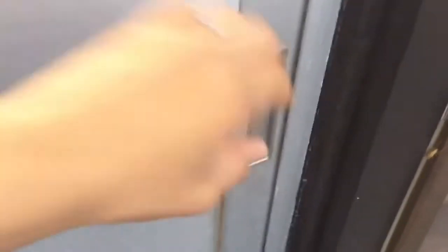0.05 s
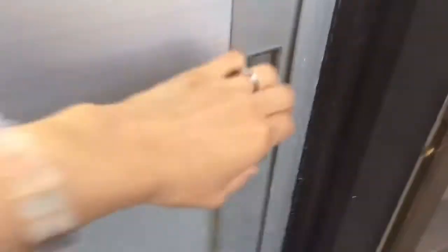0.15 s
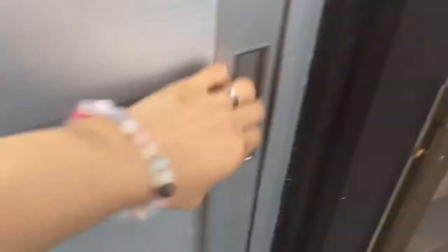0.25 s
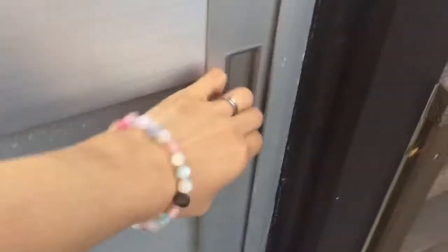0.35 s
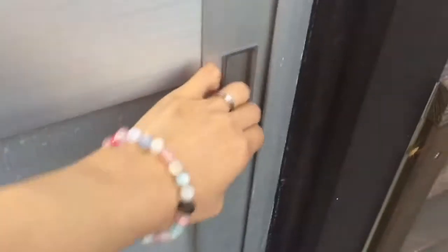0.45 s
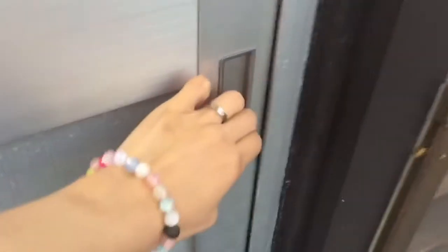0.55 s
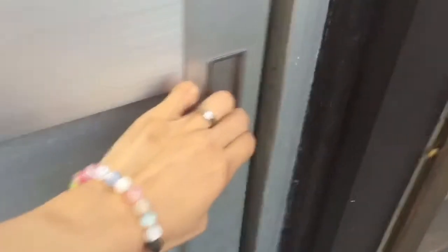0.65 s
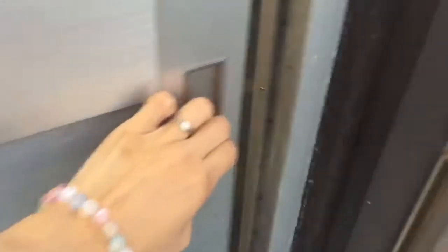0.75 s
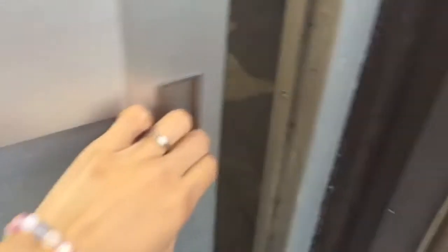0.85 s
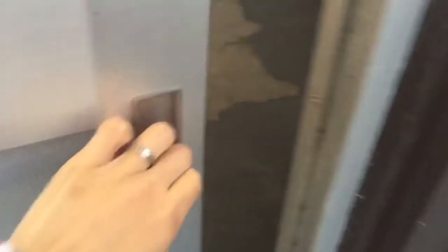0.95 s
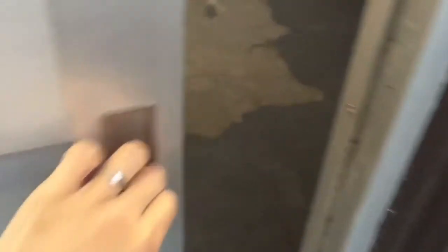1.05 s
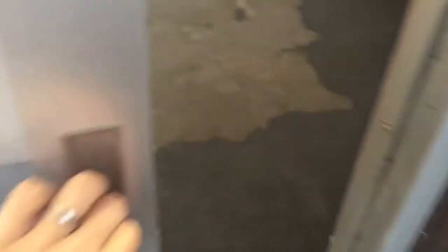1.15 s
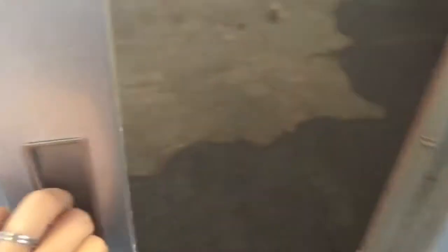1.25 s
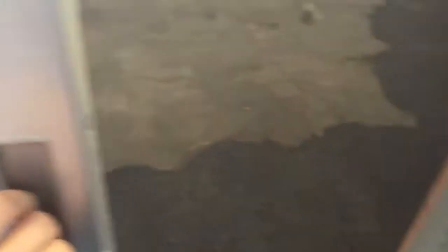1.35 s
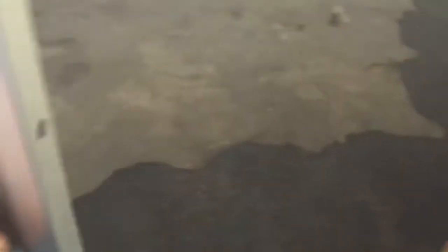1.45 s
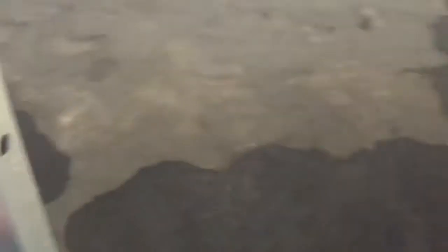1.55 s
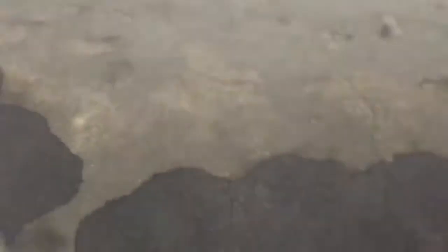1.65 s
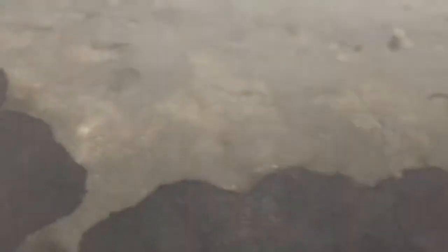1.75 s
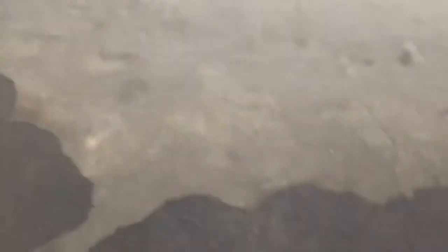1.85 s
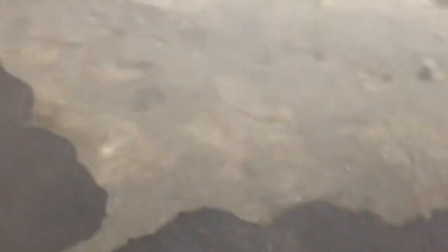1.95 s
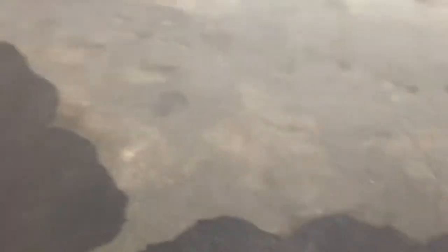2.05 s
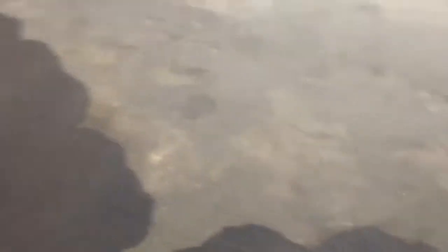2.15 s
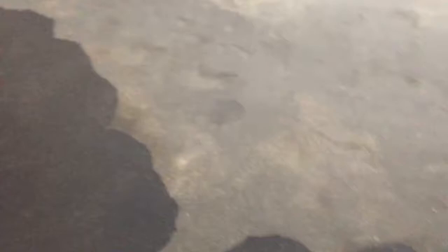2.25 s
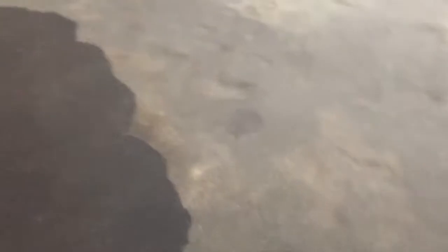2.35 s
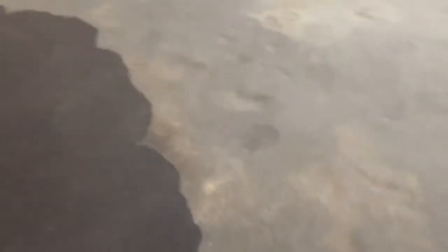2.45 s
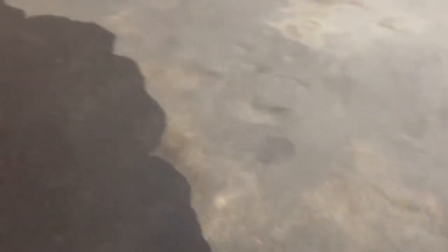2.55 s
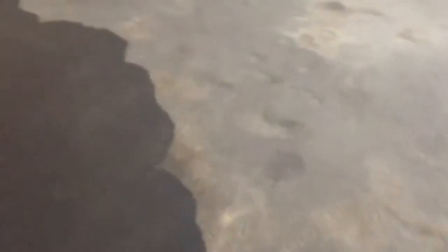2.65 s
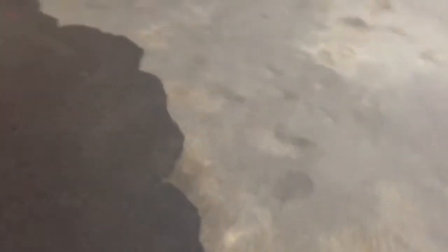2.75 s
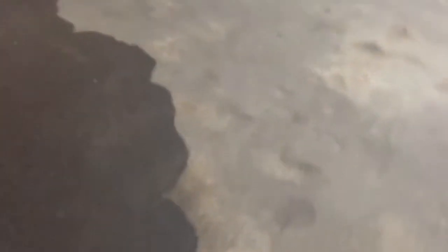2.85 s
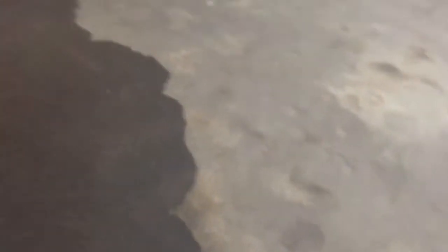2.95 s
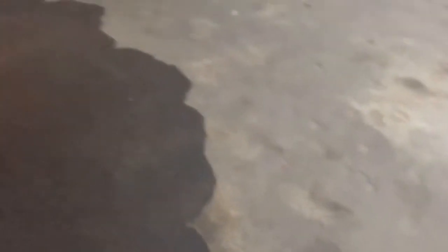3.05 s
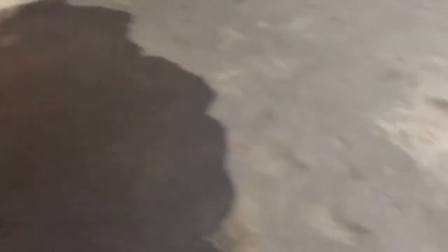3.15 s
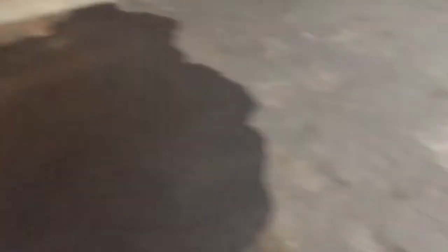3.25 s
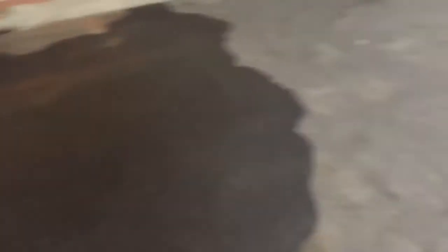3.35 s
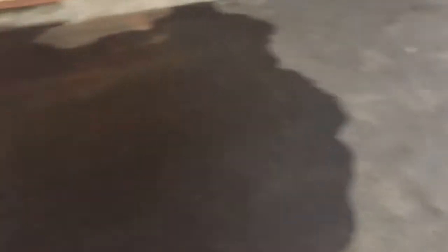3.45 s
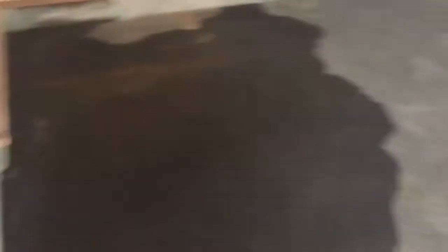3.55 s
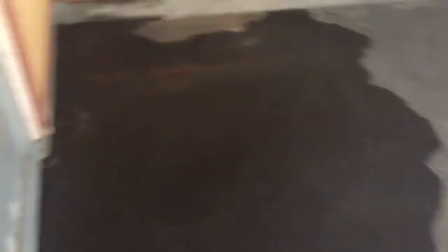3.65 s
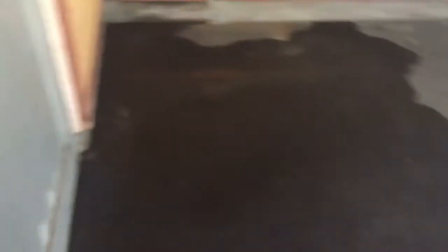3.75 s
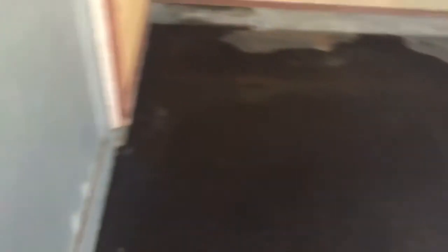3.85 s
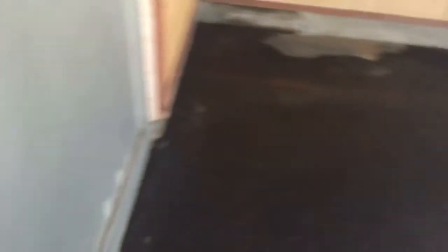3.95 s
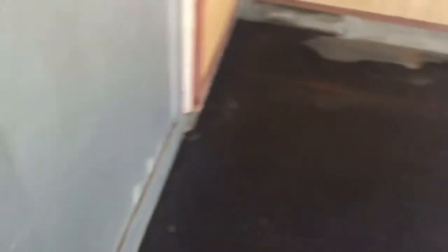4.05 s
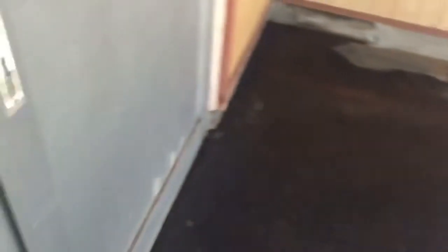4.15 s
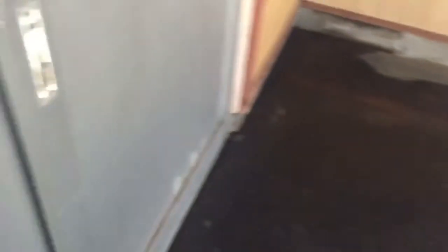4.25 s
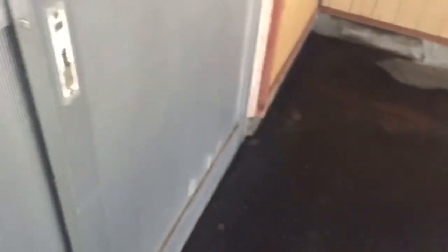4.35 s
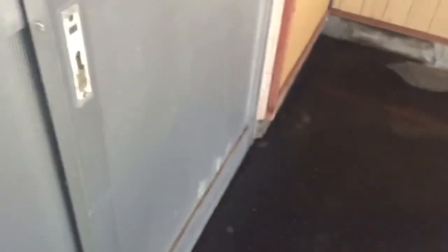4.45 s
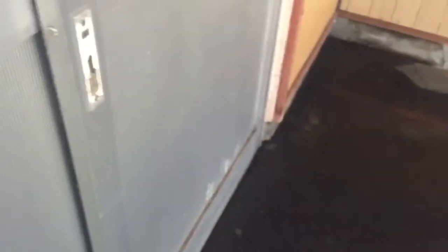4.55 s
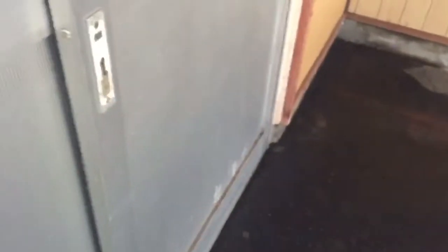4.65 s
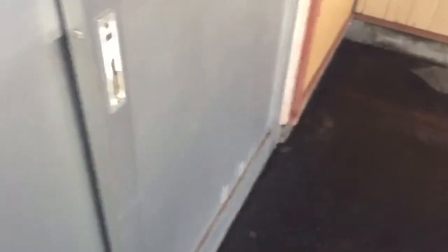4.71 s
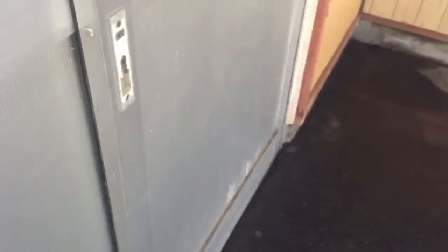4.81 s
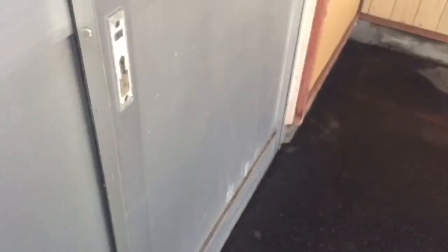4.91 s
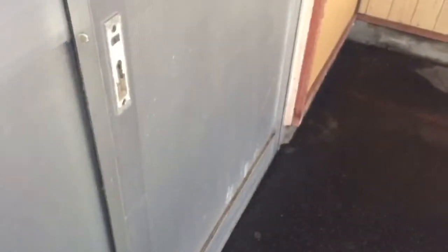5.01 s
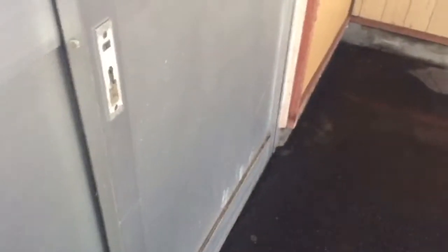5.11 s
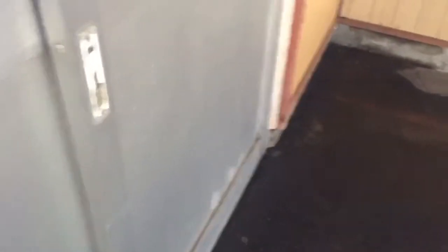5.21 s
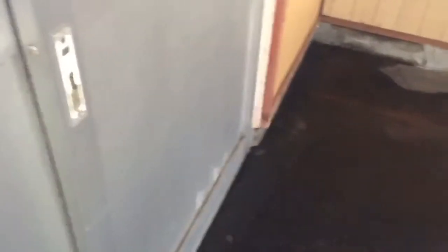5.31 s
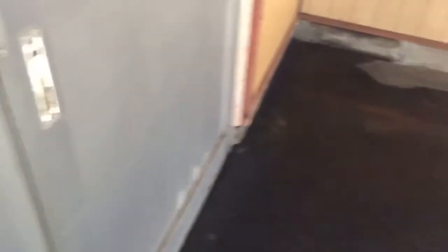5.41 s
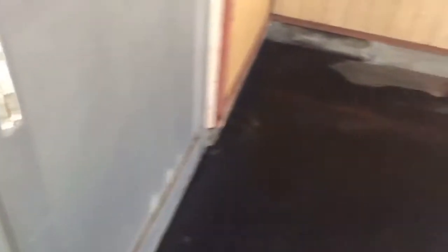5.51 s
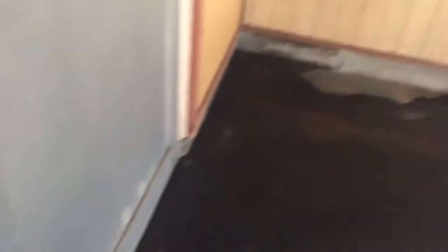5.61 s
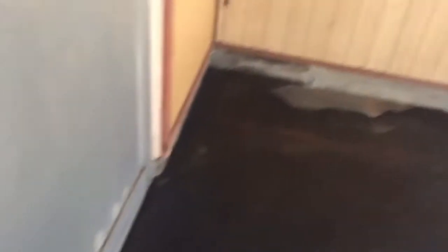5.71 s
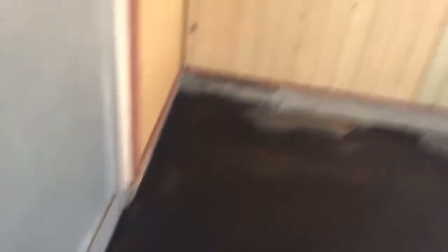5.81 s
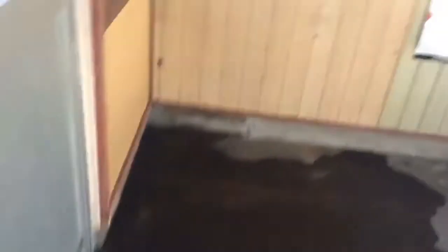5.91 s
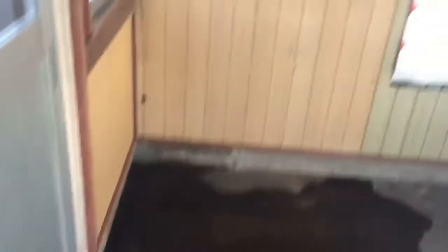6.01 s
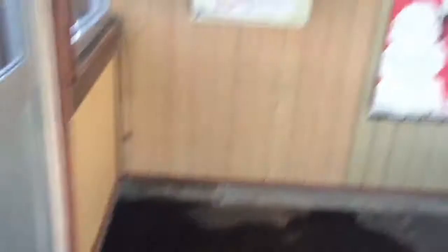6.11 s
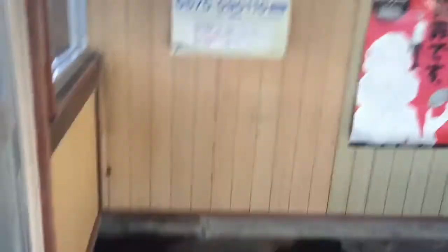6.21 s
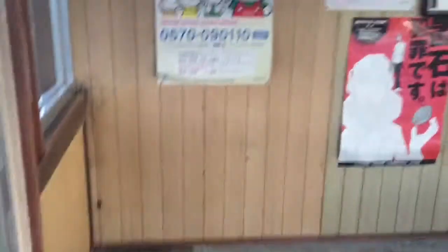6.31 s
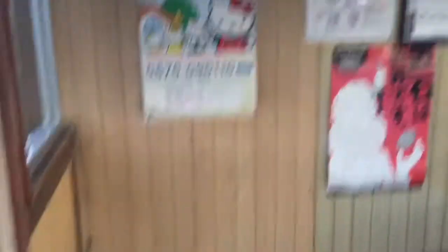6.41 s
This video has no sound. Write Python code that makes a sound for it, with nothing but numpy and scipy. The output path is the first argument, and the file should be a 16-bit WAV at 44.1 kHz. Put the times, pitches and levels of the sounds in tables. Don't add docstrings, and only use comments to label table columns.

```python
import sys
import numpy as np
from scipy import signal
from scipy.fft import rfft, irfft
from scipy.io import wavfile
from scipy.ndimage import uniform_filter1d

SR = 44100
rng = np.random.default_rng(int(sys.argv[2]) if len(sys.argv) > 2 else 0)


def materialize(psi):
    bounded = np.clip(np.atleast_2d(psi).T, -1, 1)
    quanta = np.round(bounded * 32767).astype(np.int16)
    wavfile.write(sys.argv[1], SR, quanta)


def makeup_ratio(level_db):
    decades = np.asarray(level_db, float) / 20
    return 10 ** decades


N = 285471
PANEL_HIDDEN_S, STEP_IN_S = 2.125, 3.5
FULL_SPEED_DB, FIRM_DRAG_DB = -33, -50


def rms_one(x):
    return x / np.sqrt(np.mean(x ** 2) + 1e-20)


def peak_one(x):
    return x / np.max(np.abs(x))


def in_time(rows):
    s, *columns = np.transpose(rows)
    return [np.interp(np.arange(N) / SR, s, c) for c in columns]


def played(rows):
    silent = [-110] * (len(rows[0]) - 1)
    before, after = [rows[0][0] - .05, *silent], [rows[-1][0] + 0.17, *silent]
    return in_time([before, *rows, after])


def drift(rate):
    r = np.exp(-2 * np.pi * rate / SR)
    slow = signal.lfilter([1], [1, -2 * r, r * r], rng.standard_normal(N + SR))
    return rms_one(slow[SR:])


def steady(x, span_s):
    return rms_one(x / np.sqrt(uniform_filter1d(x ** 2, int(span_s * SR)) + 0.12))


def band(x, low_hz, high_hz, order=2):
    return signal.sosfilt(signal.butter(order, [low_hz, min(high_hz, .45 * SR)], "band", fs=SR, output="sos"), x)


def resonate(x, hz, width_hz):
    r = np.exp(-np.pi * width_hz / SR)
    return signal.lfilter(np.array([1, 0, -1]) * (1 - r * r) / 2, [1, -2 * r * np.cos(2 * np.pi * hz / SR), r * r], x)


def ring(x, hz, t60):
    r, w = makeup_ratio(-60 / (t60 * SR)), 2 * np.pi * hz / SR
    return signal.lfilter([0, np.sin(w)], [1, -2 * r * np.cos(w), r * r], x + 1e-18)


def clicks(times, db):
    out = np.zeros(N)
    out[(np.asarray(times) * SR).astype(int)] = makeup_ratio(db)
    return out


def coloured(x, spectrum):
    hz, db = np.transpose(spectrum)
    grid = np.log(np.arange(N // 2 + 1) * SR / N + 1)
    return rms_one(irfft(rfft(x) * makeup_ratio(np.interp(grid, np.log(hz), db)), N))


def grains(per_s, spread_db):
    sizes = makeup_ratio(spread_db * np.minimum(rng.exponential(1, N), 5)) * rng.choice([-1, 1], N)
    contacts = rms_one(sizes * (rng.random(N) < per_s / SR))
    return contacts + .5 * rng.standard_normal(N)


def body(peaks, bumps, lumpy_db, lump_rate):
    out = np.zeros(N)
    for k, (hz, width, db) in enumerate(peaks):
        gain = makeup_ratio(db + lumpy_db * drift(lump_rate))
        out += (-1) ** k * gain * rms_one(resonate(bumps, hz, width))
    return rms_one(out)


def bursts(rows, gain_db, rise_s, t60, cycles):
    out, t = np.zeros(N + SR), np.arange(SR // 5) / SR
    for s, db, hz in rows:
        rough = rng.standard_normal(len(t)) * np.clip(t / rise_s, 0, 1) * makeup_ratio(-60 * t / t60)
        puff = band(resonate(rough, hz, hz / cycles), hz / 3.85, hz * 2.6, order=3)
        out[int(s * SR):][:len(t)] += makeup_ratio(db + gain_db) * peak_one(puff)
    return out[:N]


# (pitch [Hz], level [dB per Hz])
HISS_COLOUR = [(15, -16), (35, 12), (70, 10.5), (300, -5), (700, -10.5), (2000, -13), (3430, -14.5),
               (5000, -17), (10500, -23.5), (14000, -25), (16500, -26)]
# (time [s], level [dB])
HISS_LEVEL = [
    (0, -67),
    (3.1, -65),
    (5.8, -67.5),
    (6.5, -66.5),
]
# (time [s], level [dB])
INSECT_LEVEL = [
    (0, -75.5),
    (.6, -68),
    (2.5, -76),
    (3.1, -135),
    (4.5, -86),
    (5.3, -82),
    (6.5, -86),
]


def background():
    hiss = makeup_ratio(in_time(HISS_LEVEL)[0]) * coloured(rng.standard_normal(N), HISS_COLOUR)
    chirr = rng.standard_normal(N)
    for _ in range(2):
        chirr = resonate(chirr, 2370, 260)
    throb = makeup_ratio(1.0 * drift(20))
    sizzle = makeup_ratio(-8.0) * rms_one(band(rng.standard_normal(N), 13500, 16000))
    insects = throb * steady(rms_one(chirr), 0.096) + sizzle
    return hiss + makeup_ratio(in_time(INSECT_LEVEL)[0]) * insects


# (time [s], peak level [dB], ringing pitch [Hz], ringing level [dB], 60 dB fade [s])
BEAD_CLINKS = [(0.015, -37, 9700, -32, 0.023), (0.0234, -24, 2450, -23.5, 0.046),
               (0.214, -40.5, 3320, -3, 0.0066), (0.254, -39, 7000, -26, 0.032),
               (0.338, -19.5, 8580, -20.5, 0.034), (0.36, -34, 5500, -15, 0.035),
               (0.4324, -22, 8640, -22.5, 0.068), (0.4973, -39.5, 8660, -14, 0.049),
               (0.5518, -24, 8670, -19, 0.05), (1.1594, -29, 3200, -28, 0.035),
               (3.377, -46, 3250, -20, 0.035), (3.5673, -27, 8100, -25, 0.13),
               (4.2824, -20.5, 14350, -17, 0.021), (4.9062, -38, 2530, -24, 0.11),
               (4.9062, -40, 5310, -28, 0.06), (4.9062, -40, 6520, -30, 0.05),
               (4.9062, -40.5, 3500, -20, 0.082), (4.985, -42, 4600, -21, 0.038),
               (5.309, -53.5, 2380, 3.5, 0.074), (5.313, -59, 1185, 5, 0.096),
               (5.7865, -40, 3600, -21, 0.012), (5.813, -45, 5860, -21, 0.015),
               (5.803, -39, 3280, -24, 0.039), (5.901, -39, 4500, -27, 0.035)]


def clinks():
    s, db = np.transpose(BEAD_CLINKS)[:2]
    modes = np.zeros(N)
    for at_s, tick_db, hz, ring_db, t60 in BEAD_CLINKS:
        modes += ring(clicks([at_s], tick_db + ring_db), hz, t60)
    fade = signal.lfilter([1], [1, -makeup_ratio(-60 / (0.034 * SR))], clicks(s, db - 18.0) + 1e-18)
    fade = fade * rng.standard_normal(N)
    near = np.arange(N) < 4.6 * SR
    return modes + band(fade * near, 2400, 10200) + band(fade * ~near, 2700, 6700, order=3)


def strike(db, hz, thud_db, crack_db, clatters):
    t = np.arange(SR // 2) / SR
    rough = rng.standard_normal(len(t))
    swell = (hz * t) ** 0.73 * np.exp(-1.9 * hz * t)
    pulse = peak_one(band(np.sin(2 * np.pi * hz * t) * swell, 60, 2.0 * hz, order=3))
    blow = (t == 0) + 0.058 * rough * makeup_ratio(-60 * t / 0.085)
    crack = band(blow, 1430, 4040, order=3) + 0.41 * resonate(blow, 3800, 320)
    crack = peak_one(crack + 0.082 * band(blow, 6200, 12700))
    thud = np.sin(2 * np.pi * 75 * t) * makeup_ratio(-60 * t / 0.065)
    thud += 0.88 * np.sin(2 * np.pi * 190 * t) * makeup_ratio(-60 * t / 0.098)
    shudder = 0.87 * rms_one(band(rough, 230, 890, order=3)) * makeup_ratio(-60 * t / 0.18)
    if clatters:
        shudder += rms_one(band(rough, 249, 2200, order=5)) * makeup_ratio(-12.5 - 60 * t / 0.17)
    hit = pulse * makeup_ratio(db - 2.5) + crack * makeup_ratio(crack_db - 7.0)
    return hit, (thud + shudder) * np.clip(t / 0.0032, 0, 1) * makeup_ratio(thud_db - 2)


# (time [s], peak level [dB], pitch [Hz], thud level [dB], crack level [dB])
DRY_TAPS = [
    (0.214, -41.5, 1690, -68, -39),
    (5.448, -37, 350, -36, -40),
    (5.903, -46, 470, -47, -44),
    (5.914, -35, 1900, -62, -37.5),
    (6.003, -54, 620, -68, -74),
    (6.184, -38, 530, -65, -80),
    (6.207, -58, 600, -79, -53),
    (6.332, -71, 437, -64.5, -85),
]
# (time [s], peak level [dB], pitch [Hz], thud level [dB], crack level [dB])
DOOR_KNOCKS = [
    (0.294, -36.5, 302, -44.5, -45),
    (2.523, -40.5, 1750, -63, -61),
    (2.585, -23, 770, -49, -33.5),
    (3.192, -33, 726, -44.5, -20),
    (3.22, -18.5, 800, -38.5, -33),
    (3.785, -25, 810, -38, -42),
    (4.771, -17.5, 934, -32, -38.5),
    (5.301, -45, 1270, -46.5, -44),
    (5.435, -19, 870, -33.5, -22.5),
]


def knocks():
    out, send = np.zeros(N + SR), np.zeros(N + SR)
    for table, room_db, clatters in [(DOOR_KNOCKS, -10, True), (DRY_TAPS, -22, False)]:
        for s, *settings in table:
            hit, sheet = strike(*settings, clatters)
            at = slice(int((s + .001) * SR), int((s + .001) * SR) + len(hit))
            out[at] += hit + sheet
            send[at] += hit * makeup_ratio(room_db)
    return out[:N], send[:N]


# (pitch [Hz], width [Hz], level [dB])
ROOM_COLOUR = [(710, 67, -1), (934, 31, -3), (1400, 76, -1), (3230, 1100, -2.5)]


def room(x):
    first_echo_s, t60_s = 0.0066, 0.62
    t = np.arange(int(SR * .7)) / SR
    tail = band(rng.standard_normal(len(t)), 350, 4200, order=1) * makeup_ratio(-60 * t / t60_s) * (t > first_echo_s)
    tail += sum(makeup_ratio(db) * resonate(tail, hz, width) for hz, width, db in ROOM_COLOUR)
    tail /= np.sqrt(np.sum(tail ** 2))
    tail[int(first_echo_s * SR)] += .45
    return signal.fftconvolve(x, tail)[:N]


# (time [s], level [dB])
SLEEVE_BRUSH = [
    (.3, -63),
    (.325, -55),
    (.345, -42),
    (.37, -56.5),
    (.4, -60.5),
    (.415, -68),
]


def brush():
    rub = band(grains(per_s=38000, spread_db=7.0), 2500, 14500)
    rub = rub + 2.1 * resonate(rub, 5800, 200) + 1.1 * resonate(rub, 14200, 730)
    return makeup_ratio(played(SLEEVE_BRUSH)[0]) * rms_one(rub)


# (time [s], speed as drumming level [dB], drag as crunch level [dB])
OPENING_STROKE = [
    (0.52, -75, -81),
    (0.68, -41.5, -57),
    (0.78, -35, -53),
    (1.36, -32, -54),
    (1.62, -35.5, -46),
    (1.93, -43.5, -43),
    (2.15, -46, -54),
    (2.3, -57.5, -62),
    (2.48, -66.5, -83),
]
# (time [s], speed as drumming level [dB], drag as crunch level [dB])
SHUTTING_STROKE = [
    (3.24, -47.5, -64),
    (3.45, -36, -60),
    (3.86, -32, -52.5),
    (4.12, -34, -49.5),
    (4.42, -32.5, -44),
    (4.68, -37, -60.5),
    (4.9, -46.5, -90),
    (5.36, -49.5, -76),
    (5.66, -58, -79),
]


def strokes():
    return np.maximum(played(OPENING_STROKE), played(SHUTTING_STROKE))


# (time [s], drumming level [dB], deep sway level [dB])
DOOR_LURCHES = [(0.77, -32, -35), (0.92, -54, -32), (1.01, -47, -77), (1.08, -28.5, -58),
                (1.13, -41, -33.5), (1.41, -55, -42), (1.72, -64, -44.5), (2.03, -50, -44.5),
                (3.45, -31.5, -46), (3.99, -31.5, -40), (4.11, -29, -43), (4.33, -30, -57),
                (4.46, -55, -38), (4.64, -49, -38), (4.79, -38.5, -34), (5.0, -57, -38.5),
                (5.25, -49.5, -42.5), (5.475, -33.5, -33), (5.56, -42, -39)]


def lurches():
    t, power = np.arange(N) / SR, np.zeros((2, N))
    for s, *db in DOOR_LURCHES:
        fall_db = np.where(t < s, 170 * (s - t), 167 * (t - s))
        power += makeup_ratio(2 * np.array(db))[:, None] * makeup_ratio(-2 * np.minimum(fall_db, 90))
    return power


# (pitch [Hz], width [Hz], level [dB])
PANEL_OUTSIDE = [(133, 39.4, 2), (159, 79, 3.5), (202.5, 69, 4.5), (278, 33, -12.5)]
# (pitch [Hz], width [Hz], level [dB])
PANEL_INSIDE = [(99, 27, -2), (140.5, 22.2, 5), (208.4, 33.5, -5), (280, 104, -4.5)]
# (pitch [Hz], width [Hz], level [dB])
DOOR_SWAY = [(62.4, 27, -1.6), (82, 3.7, -0.16)]


def panel():
    speed_db, (drum_lurch, sway_lurch) = strokes()[0], lurches()
    drum_gain = np.sqrt(makeup_ratio(2 * speed_db) + drum_lurch)
    sway_db = -47 + 0.72 * (speed_db - FULL_SPEED_DB)
    sway_gain = np.sqrt(makeup_ratio(2 * sway_db) + sway_lurch)
    bumps = band(grains(per_s=300, spread_db=-1.0), 47, 410)
    hidden = np.clip((np.arange(N) / SR - PANEL_HIDDEN_S) / 0.29, 0, 1)
    drum = hidden * body(PANEL_INSIDE, bumps, 2.73, 6.8) + (1 - hidden) * body(PANEL_OUTSIDE, bumps, 1.07, 34.0)
    return drum_gain * steady(drum, 0.061) + sway_gain * steady(body(DOOR_SWAY, bumps, 0.15, 2.1), 0.1)


# (time [s], level [dB], squeal pitch [Hz], hold [s], 60 dB fade [s])
SEAL_CATCHES = [(0.706, -28.5, 6850, 0.023, 0.11), (0.749, -35.5, 4530, 0.12, 1),
                (0.841, -30, 4760, 0.063, 0.045), (0.936, -27.5, 4400, 0.036, 0.064),
                (1.216, -31, 4440, 0.0094, 0.12), (1.524, -29.5, 4630, 0.017, 0.32),
                (1.591, -29, 5860, 0.032, 0.085), (1.496, -39, 6900, 0.013, 0.18),
                (1.559, -33, 7460, 0.012, 0.15), (1.636, -39, 8650, 0.019, 0.18),
                (1.665, -35, 9000, 0.008, 0.12), (1.936, -48, 8000, 0.012, 0.2),
                (5.296, -51.5, 3470, 0.028, 0.28), (3.827, -38.5, 7300, 0.03, 0.62),
                (3.828, -50, 3220, 0.018, 0.2), (3.476, -42, 1900, 0.026, 0.08),
                (3.9, -42, 1550, 0.017, 0.087), (1.733, -31, 5430, 0.031, 0.15),
                (1.817, -30.5, 5300, 0.022, 0.2), (1.857, -31.5, 6460, 0.046, 0.82),
                (2.202, -54.5, 6240, 0.047, 0.23), (3.427, -35, 4030, 0.03, 0.54),
                (3.48, -34, 4550, 0.015, 0.52), (3.816, -34.5, 4500, 0.014, 0.23),
                (4.002, -31.5, 7800, 0.01, 0.45), (4.24, -32, 4500, 0.054, 0.57),
                (4.373, -33, 4470, 0.022, 0.27), (5.363, -46.5, 5570, 0.043, 0.31),
                (5.427, -39.5, 4600, 0.011, 0.33)]


def catches():
    seal, grit, squeal, t = np.zeros(N), np.zeros(N), np.zeros(N), np.arange(N) / SR
    rub = rng.standard_normal(N)
    for s, db, hz, hold, t60 in SEAL_CATCHES:
        grit_db = 5 if s > PANEL_HIDDEN_S else 3
        fade_db = 60 * np.clip(t - s - hold, 0, 2) / t60
        shape = np.clip((t - s) / 0.0048, 0, 1) * makeup_ratio(db - 18.0 - fade_db)
        seal += shape ** 2
        grit += (shape * makeup_ratio(grit_db)) ** 2
        at = slice(int(s * SR), int((s + hold + t60) * SR))
        squeal[at] += resonate(shape[at] * rub[at], hz, 170)
    return seal, grit, makeup_ratio(11.0) * squeal


# (pitch [Hz], width [Hz], level [dB])
FRAME_OUTSIDE = [(330, 82, 1.5), (530, 13, -1.3), (606.5, 17, 0.06), (856, 110, -0.38), (1080, 260, -0.85)]
# (pitch [Hz], width [Hz], level [dB])
FRAME_INSIDE = [(323, 150, 1), (511, 220, 4.5), (590, 89, 4.5), (900, 410, 0.5), (1425, 210, -6)]


def frame_drone():
    speed_db, grit_db = strokes()
    gain = np.hypot(makeup_ratio(-39 + 1.77 * (speed_db - FULL_SPEED_DB)), makeup_ratio(grit_db - 4))
    gain = np.hypot(gain, makeup_ratio(-17) * np.sqrt(lurches()[0]))
    bumps = band(grains(per_s=1100, spread_db=2.0), 298, 2600)
    inside = np.arange(N) > STEP_IN_S * SR
    frame = np.where(inside, body(FRAME_INSIDE, bumps, 2.5, 9.8), body(FRAME_OUTSIDE, bumps, 0.96, 18.0))
    return gain * steady(frame, 0.059)


# (pitch [Hz], level [dB per Hz])
GRIT_COLOUR = [(710, 4.5), (1200, 4.5), (1650, 7.5), (1940, 8), (2480, 5), (3300, -11.5), (4840, -12.5),
               (6000, -14), (7800, -63), (13200, -120)]
# (pitch [Hz], width [Hz], level [dB])
RAIL_MODES = [(1900, 17, 2), (2204, 38, 7), (2860, 180, 0.5), (3250, 180, 4), (3890, 760, 0),
              (4960, 770, -21)]
# (pitch [Hz], level [dB per Hz])
SEAL_COLOUR = [(2350, -6.5), (4000, -0.5), (4820, -10), (5410, -7.5), (8960, -12), (10200, -17.5),
               (11400, -19.5), (12300, -14.5), (14500, -28), (16000, -14)]
# (pitch [Hz], width [Hz], level [dB])
EDGE_MODES = [(5650, 160, 0), (6600, 120, -1), (7300, 140, -2), (8650, 130, -6), (9700, 200, -16),
              (11200, 160, -10), (13300, 250, -12)]


def track_and_seal():
    grit_db = strokes()[1]
    shut_side = np.arange(N) > PANEL_HIDDEN_S * SR
    seal_db = np.where(shut_side, -102, -63) + 0.66 * (grit_db - FIRM_DRAG_DB)
    seal_catch, grit_catch, squeal = catches()
    flutter = drift(9.1)
    crunch = grains(per_s=1500, spread_db=1.5)
    grit = coloured(crunch, GRIT_COLOUR) * makeup_ratio(2.84 * flutter) + 0.44 * body(RAIL_MODES, crunch, 4.6, 24)
    seal = coloured(grains(per_s=5600, spread_db=4.0), SEAL_COLOUR) * makeup_ratio(2.4 * flutter + 2.0 * drift(29))
    seal += .45 * body(EDGE_MODES, rng.standard_normal(N), 5.5, 12)
    grit *= np.sqrt(makeup_ratio(2 * grit_db) + grit_catch)
    seal *= np.sqrt(makeup_ratio(2 * seal_db) + seal_catch)
    return grit + seal + squeal


# (time [s], peak level [dB], pitch [Hz])
OUTSIDE_JOLTS = [(0.695, -30.5, 666), (0.719, -35, 646), (0.757, -28, 616), (0.835, -24.5, 890),
                 (0.882, -22.5, 652), (0.908, -26, 622), (0.968, -26, 547), (1.011, -25, 633),
                 (1.038, -34, 655), (1.07, -23, 584), (1.094, -27, 586), (1.157, -34, 624),
                 (1.223, -44, 610), (1.302, -39, 616), (1.337, -25, 503), (1.369, -24, 610),
                 (1.438, -29, 590), (1.48, -26, 546), (1.55, -25, 588), (1.593, -22, 494),
                 (1.65, -26.5, 600), (1.775, -26.5, 910), (1.828, -25.5, 585), (1.932, -30, 502),
                 (1.982, -38, 580), (2.108, -31, 900)]
# (time [s], peak level [dB], pitch [Hz])
INSIDE_JOLTS = [(3.321, -41, 710), (3.354, -31.5, 520), (3.379, -33, 810), (3.43, -25, 367),
                (3.464, -25, 1286), (3.563, -23, 383), (3.607, -31, 383), (3.733, -41, 350),
                (3.82, -20, 291), (3.887, -21, 558), (3.968, -20.5, 570), (4.081, -22.5, 820),
                (4.131, -24.5, 332), (4.151, -24, 278), (4.244, -29, 604), (4.337, -49, 297),
                (4.4, -40, 513), (4.637, -37, 285), (4.69, -41, 288), (4.768, -25.5, 874),
                (4.978, -43.5, 440), (5.056, -57, 283), (5.127, -41, 280), (5.184, -56, 328),
                (5.243, -36, 274), (5.272, -54, 283), (5.303, -34.5, 1200), (5.407, -64, 926)]
# (time [s], peak level [dB], pitch [Hz])
FRAME_SURGES = [(0.895, -35, 1090), (0.945, -44, 2060), (0.95, -49, 2700), (1.088, -19, 640),
                (1.106, -25.5, 770), (1.15, -25, 610), (1.42, -24, 560), (1.54, -27.5, 620),
                (1.575, -27.5, 540), (1.69, -26.5, 610), (3.845, -23.5, 900), (4.40, -28, 734),
                (4.775, -37.5, 1560), (4.78, -27.5, 484), (4.82, -45, 1260), (4.80, -50, 2150),
                (4.86, -47, 1660), (2.1, -45, 330), (2.22, -43, 325), (3.5, -25.5, 193), (4.5, -26.5, 262),
                (4.58, -35, 274), (4.66, -46, 270), (5.46, -42, 1000), (5.5, -43, 1770), (5.56, -44, 915),
                (5.13, -50, 530), (5.31, -46, 1260), (5.37, -45, 3100), (3.2, -34, 2950)]
# (time [s], peak level [dB], pitch [Hz])
GRIT_CRACKS = [(0.67, -38, 3250), (0.6934, -29, 1800), (0.7172, -23, 5570), (0.814, -40, 1900),
               (1.0226, -32, 1900), (1.0484, -48, 1830), (1.0854, -38, 1890), (1.4984, -39, 2240),
               (1.5604, -29, 2230), (1.5915, -23, 1890), (1.7434, -25, 3270), (1.8704, -25, 1930),
               (1.9324, -40, 1800), (3.27, -45, 3000), (3.445, -34, 1870), (3.489, -25, 1940),
               (3.7, -41, 2480), (3.7354, -49, 2570), (3.7858, -30, 1800), (3.8267, -38, 4050),
               (4.2914, -31, 2660), (4.3986, -35, 2190), (4.5422, -41, 2340)]


def jolts():
    short = bursts(OUTSIDE_JOLTS + INSIDE_JOLTS, gain_db=-7.5, rise_s=0.009, t60=0.038, cycles=17.8)
    long = bursts(FRAME_SURGES, gain_db=-4.5, rise_s=0.013, t60=0.098, cycles=8.7)
    return short + long + bursts(GRIT_CRACKS, gain_db=-10, rise_s=0.003, t60=0.039, cycles=5.9)


# (time [s], peak level [dB], bright tick level [dB])
RATTLE_TAPS = [(0.721, -36, -41), (0.755, -27, -80), (0.837, -21, -51), (0.9006, -19, -44),
               (0.955, -37, -43), (1.015, -12.5, -31), (1.129, -16, -36.5), (1.1855, -16.5, -36),
               (1.3039, -13, -30.5), (1.3623, -12, -24.5), (1.417, -20.5, -59), (1.482, -21, -56),
               (1.535, -14.5, -41), (1.5878, -13.5, -59), (1.6117, -25, -20.5), (1.6433, -16, -62),
               (1.67, -38, -48), (1.699, -11, -27), (1.757, -14, -42), (1.8241, -9, -19),
               (1.8946, -15, -24), (1.978, -12.5, -88), (2.1098, -21, -57), (3.468, -14.5, -24),
               (4.006, -55, -29), (4.088, -19, -35), (4.1513, -13.5, -26.5), (4.244, -42, -22),
               (4.3345, -16, -21.5), (4.3687, -21, -23)]
# (pitch [Hz], level [dB], 60 dB fade [s])
ROLLER_MODES = [(1150, 3.5, 0.024), (1246, 5.5, 0.022), (1430, -25, 0.018)]


def rattle():
    modes, ticks, t = np.zeros(N + SR), np.zeros(N + SR), np.arange(SR // 10) / SR
    rise = 1 - np.exp(-t / 0.0012)
    for s, db, tick_db in RATTLE_TAPS:
        chance, rough = rng.standard_normal(4), rng.standard_normal(len(t))
        at = slice(int(s * SR), int(s * SR) + len(t))
        for (mode_hz, mode_db, t60), c in zip(ROLLER_MODES, chance):
            tone = np.sin(2 * np.pi * mode_hz * (1 + 0.04 * c) * t)
            modes[at] += rise * tone * makeup_ratio(db + mode_db - 16.0 + 1.5 * c - 60 * t / t60)
        hz = (3300 if s > PANEL_HIDDEN_S else 2900) * np.exp(0.015 * chance[3])
        tick = rough * makeup_ratio(0.5 - 60 * t / 0.03) + np.sin(2 * np.pi * hz * t) * makeup_ratio(-4.0 - 60 * t / 0.014)
        ticks[at] += rise * makeup_ratio(tick_db) * tick
    return band(modes[:N], 640, 3400) + band(ticks[:N], 1950, 4090)


# (time [s], level [dB], pitch [Hz], hold [s])
SINGING_MODES = [(0.937, -48, 2040, 0.03), (0.94, -52, 2730, .012), (2.824, -59, 2234, 0.038),
                 (2.98, -70, 2210, 0.072), (0.845, -50.5, 3276, 0.037), (3.45, -52, 1924, 0.055),
                 (3.817, -52, 4060, 0.022), (3.822, -55, 3120, 0.031), (4.011, -52, 2490, 0.1),
                 (4.013, -58, 3990, 0.037), (4.242, -38, 3250, 0.0098), (4.245, -52, 4240, 0.043),
                 (4.248, -63, 5730, 0.18), (4.28, -63, 7230, 0.036), (4.368, -53, 3300, 0.065),
                 (4.783, -72, 2570, 0.081), (5.445, -72, 2650, 0.069)]


def singing():
    out, t, width_hz = np.zeros(N + SR), np.arange(SR // 3) / SR, 55
    for s, db, hz, hold in SINGING_MODES:
        rough = rng.standard_normal(len(t))
        mode = steady(resonate(resonate(rough, hz, width_hz), hz, 3 * width_hz), .015)
        fade_db = 60 * np.clip(t - hold, 0, 1) / 0.15
        out[int(s * SR):][:len(t)] += mode * np.clip(t / 0.002, 0, 1) * makeup_ratio(db - fade_db)
    return out[:N]


# (time [s], level [dB], pitch [Hz], hold [s])
PANEL_HUMS = [
    (2.19, -44, 132, 0.11),
    (2.709, -48, 129.3, 0.026),
    (2.87, -55.5, 133, 0.034),
    (2.941, -51, 130, 0.024),
    (2.971, -62, 337, 0.057),
    (3.478, -20, 132.8, 0.026),
    (5.372, -39, 144.6, 0.03),
    (5.683, -43.5, 78, 0.037),
]


def hums():
    t, tones = np.arange(N) / SR, np.zeros(N)
    for s, db, hz, hold in PANEL_HUMS:
        t60 = 0.94 * min(hold / 0.18, 1)
        fade_db = 60 * np.clip(t - s - hold, 0, 2) / t60
        tones += np.clip((t - s) / 0.025, 0, 1) * np.sin(2 * np.pi * hz * t) * makeup_ratio(db - 0.5 - fade_db)
    return makeup_ratio(1.24 * drift(25)) * tones


# (time [s], level [dB], hold [s], top pitch [Hz], dull rub level [dB])
SHOE_SCUFFS = [
    (2.692, -79, 0.091, 8350, -78),
    (2.822, -53.5, 0.023, 7800, -79),
    (2.936, -62, 0.0088, 10500, -85),
    (2.97, -63, 0.046, 11200, -62.5),
]
# (pitch [Hz], width [Hz], level [dB])
SOLE_MODES = [(2190, 123, 2.5), (2920, 49, -20), (3910, 300, -6.5), (4680, 14, 2), (6120, 100, -6),
              (7100, 200, -17), (6700, 41, -1), (8100, 60, -7)]


def scuffs():
    t, rub, dull = np.arange(N) / SR, np.zeros(N), np.zeros(N)
    grit = rms_one(grains(per_s=10000, spread_db=3.0))
    for s, db, hold, top_hz, dull_db in SHOE_SCUFFS:
        fade_db = 60 * np.clip(t - s - hold, 0, 2) / 0.051
        drag = np.clip((t - s) / 0.017, 0, 1) * makeup_ratio(-fade_db) * grit
        rub += makeup_ratio(db) * band(drag, 1200, top_hz, order=3)
        dull += makeup_ratio(dull_db + 10.5) * drag
    whistle = sum(makeup_ratio(db + 17.5) * resonate(rub, hz, 2.3 * width) for hz, width, db in SOLE_MODES)
    return rub + band(dull, 230, 1000) + whistle


# (time [s], peak level [dB], 60 dB fade [s])
HEEL_THUMPS = [
    (5.9144, -31.5, 0.053),
    (6.184, -39, 0.14),
    (6.205, -49, 0.16),
]


def heels():
    out, t = np.zeros(N + SR), np.arange(SR // 4) / SR
    top_hz, end_hz, slide_s = 520, 62, .0018
    turns = end_hz * t + top_hz * slide_s * (1 - np.exp(-t / slide_s))
    for s, db, t60 in HEEL_THUMPS:
        out[int(s * SR):][:len(t)] += np.sin(2 * np.pi * turns) * makeup_ratio(db - 60 * t / t60)
    return band(out[:N], 25, 910, order=3)


def scene():
    hits, send = knocks()
    small = jolts() + rattle() + scuffs()
    door = panel() + frame_drone() + track_and_seal() + hums()
    dry = clinks() + hits + brush() + door + small + heels()
    return (background() + dry + room(send + makeup_ratio(-11.5) * small) + singing())[None]


def roll_off(x):
    return signal.sosfilt(signal.butter(12, 15840, fs=SR, output="sos"), x)


def record(dry):
    low_cut = signal.sosfilt(signal.butter(3, 42, "high", fs=SR, output="sos"), dry)
    top_cut = signal.sosfilt(signal.cheby2(12, 60, 16750, fs=SR, output="sos"), low_cut)
    return roll_off(top_cut)


dry = scene()
out = record(dry)
materialize(out)
```